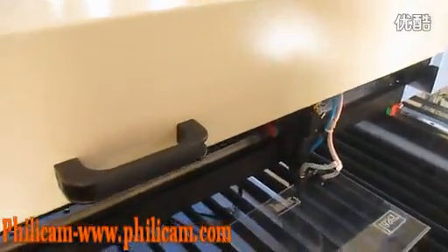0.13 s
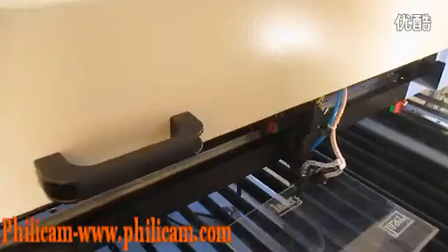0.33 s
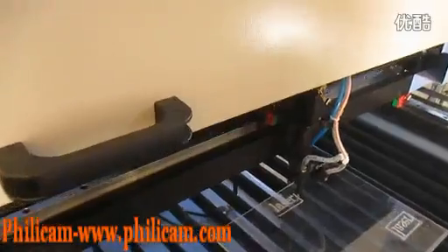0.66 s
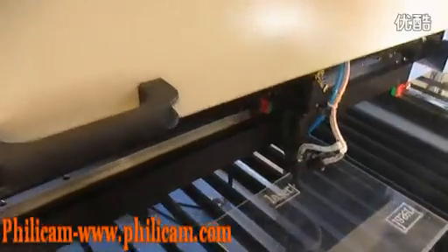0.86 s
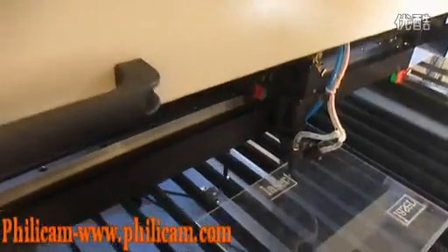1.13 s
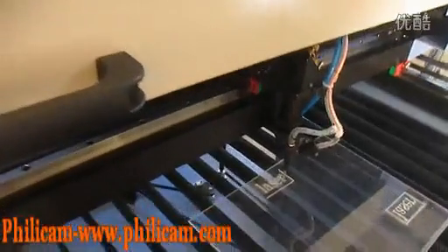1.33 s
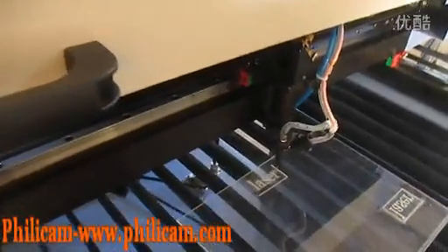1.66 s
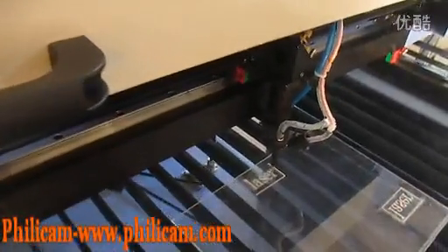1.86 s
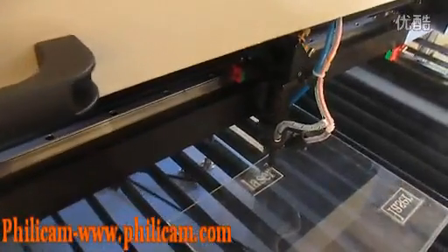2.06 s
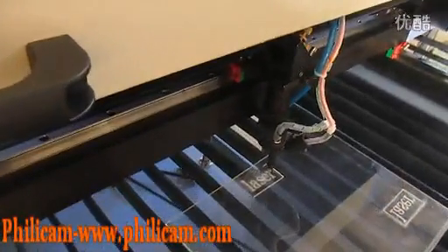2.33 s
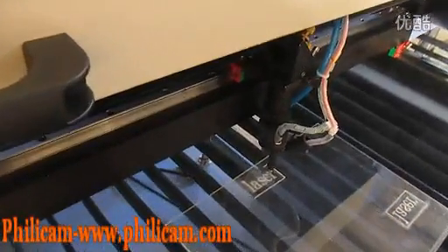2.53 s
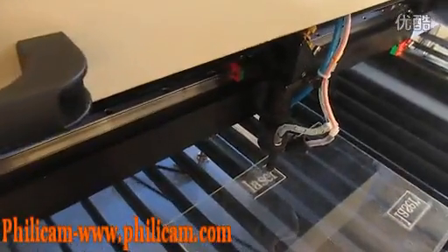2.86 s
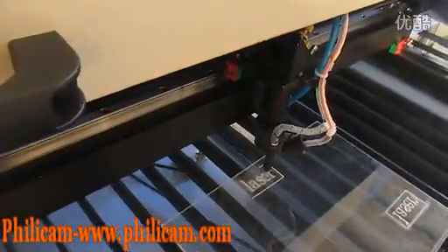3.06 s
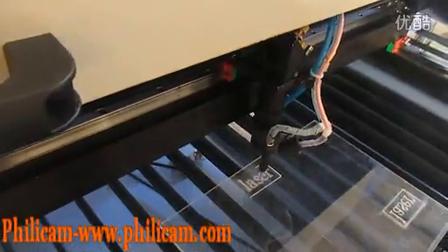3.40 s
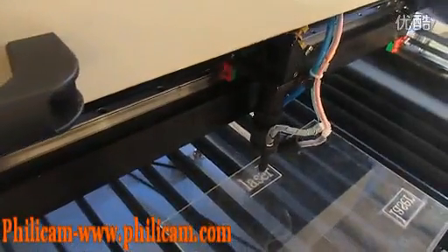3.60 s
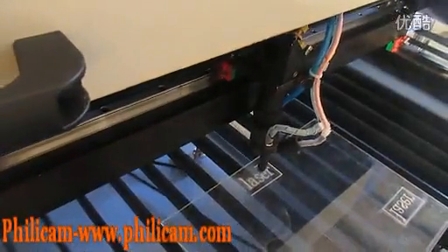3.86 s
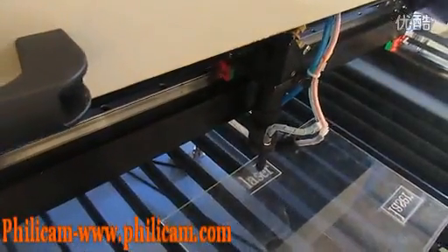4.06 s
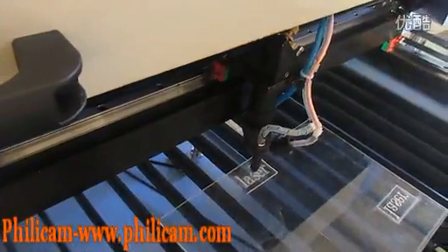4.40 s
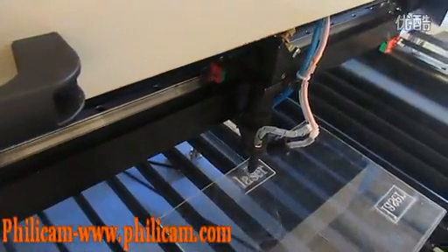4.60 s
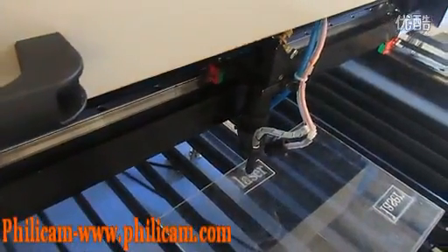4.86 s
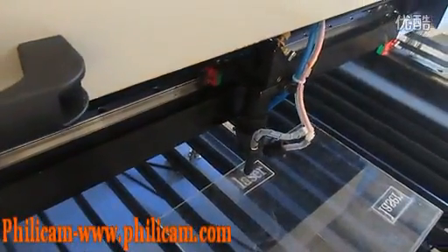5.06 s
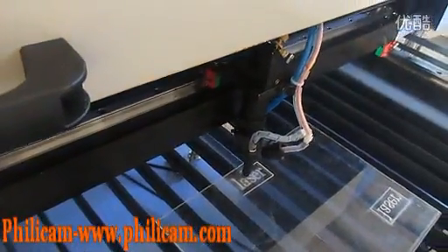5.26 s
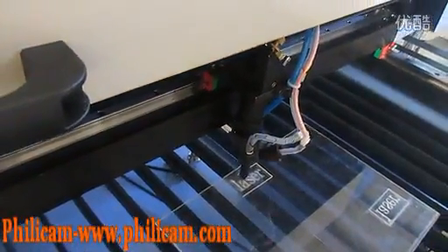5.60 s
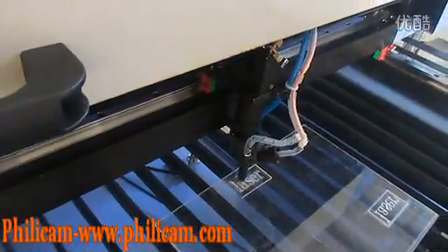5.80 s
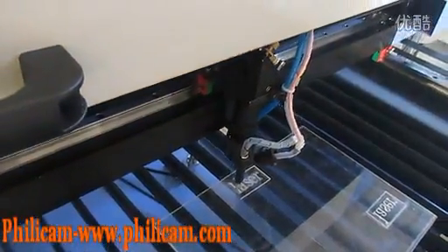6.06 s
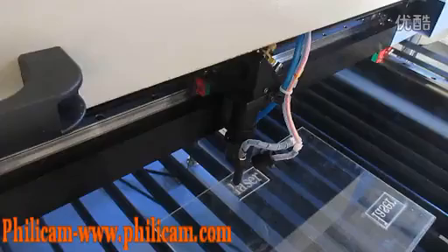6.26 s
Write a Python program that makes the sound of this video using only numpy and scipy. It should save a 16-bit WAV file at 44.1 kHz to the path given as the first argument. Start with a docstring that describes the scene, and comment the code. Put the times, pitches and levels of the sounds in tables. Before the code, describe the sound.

A flatbed laser cutter heard close up in a workshop. A loud, continuous mid-heavy extraction roar dominates, over a low mains hum. Fan tones whine steadily through it, swelling and fading, while the nozzle's air jet adds patchy hiss and shrill, unsteady whistles. The roar eases slightly midway, then recovers. Tiny treble ticks are barely noticeable. Nearly central stereo, with only the highest hiss spreading wide.

```python
"""A flatbed laser cutter in a workshop, heard in stereo from close by.
From the start extraction air roars (coloured noise) over a mains-rate pump hum and whining fans (wavering sines),
the nozzle's air jet hisses in four noise bands and whistles in moving resonances as the head moves, and the
treble flickers. Within the first second brief flecks of treble begin; the slow motor fades throughout, the roar
sinks midway and returns, and the high whistle, having slid down and faded, starts again higher."""
import sys
import numpy as np
from scipy import signal
from scipy.fft import rfft, irfft
from scipy.io import wavfile
from scipy.ndimage import uniform_filter1d

SR = 44100
rng = np.random.default_rng(int(sys.argv[2]) if len(sys.argv) > 2 else 0)


def put_to_file(sound):
    """Save the sound as 16-bit audio at rate SR, in the file named by the first command-line argument."""
    columns = np.atleast_2d(sound).T  # one column per channel
    safe = np.clip(columns, -1, 1)
    whole_steps = np.round(safe * 32767)
    wavfile.write(sys.argv[1], SR, whole_steps.astype(np.int16))


N = 283563  # length in samples
T = np.arange(N) / SR  # time in seconds

# Air roar of the extraction and the shop. Each row: frequency in Hz, relative spectrum level in dB.
ROAR_SPECTRUM = [(15, -13), (25, -13), (49, -16), (218, -5), (382, -4), (506, -0.5), (989, -2.5),
                 (1200, -1.5), (1490, -3.5), (1850, -5), (2250, -10), (2400, -10), (3200, -14.5),
                 (3780, -19.5), (4000, -24), (4230, -30.5), (4450, -21.5), (5720, -81), (9680, -120)]
# Broad resonances of ducts and cabinet. Each row: centre in Hz, width in Hz, boost in dB (negative: a dip).
DUCT_RESONANCES = [(218, 35, 4), (204, 52, 4), (252, 10, 7.5), (134, 39, -2.5), (170, 15.5, -8),
                   (344, 10, -1), (464, 26, 1.5), (706.6, 5.7, 11), (909, 35, 5.5), (1117, 46, 5),
                   (2060, 27, 4.5)]
# How deeply the treble flickers. Each row: frequency in Hz, depth in dB for one spread of the patches.
TREBLE_FLICKER = [(1500, 1), (2200, 6), (3200, 11), (4200, 17)]
PATCH_TOP = 0.9  # patches dip freely but rise no further than this many spreads
ROAR_DB, ROAR_SAG_DB = -21.5, 2.5  # level in dB, and how far it sinks midway
RUMBLE_DB, RUMBLE_SAG_DB = -27, 7.5  # the same for the low end
QUIET_S, SAG_WIDTH_S = 3.33, 4  # middle and half-width of the sinking, in seconds

# Pump on the mains. Each row: multiple of the mains rate, level in dB before it wavers.
PUMP_MULTIPLES = [(1, -44.5), (2, -42.5), (3, -40), (4, -44.5), (6, -44.5), (7, -42.5), (8, -47)]
PUMP_HZ = 50.0
MOTOR_HZ, MOTOR_DB, MOTOR_FADE_DB_PER_S = 73.2, -37.5, 5  # slow motor

# Higher fan's blade tone. Each row: time in seconds, level in dB.
FAN_HIGH_LEVEL = [(0, -30), (.4, -33.5), (.55, -42), (1.3, -35.5), (1.55, -30), (2.1, -28.5), (3, -29),
                  (4.3, -29.5), (5.02, -30.5), (5.1, -37), (5.25, -33), (6.43, -37)]
# Breathy fringe round that tone. Each row: time in seconds, level in dB.
FAN_FRINGE_LEVEL = [(0, -33.5), (.9, -38.5), (1.3, -52), (5.6, -51), (6.43, -40)]
# Whine near its second multiple. Each row: time in seconds, pitch in Hz, level in dB.
FAN_SECOND = [(0, 3789, -35), (.5, 3788.5, -35.5), (1.3, 3787, -40), (1.8, 3785, -45), (2.05, 3786, -58),
              (2.7, 3785, -48), (4.4, 3777, -49), (5.2, 3776, -50), (5.65, 3773, -42), (6.43, 3770, -41)]
# Lower fan's blade tone. Each row: time in seconds, level in dB.
FAN_LOW_LEVEL = [(0, -36.5), (1.0, -37), (1.38, -39), (1.5, -28), (1.65, -43), (1.9, -31.5), (2.25, -36.5),
                 (2.5, -27.5), (2.62, -42), (3.0, -46), (3.15, -31.5), (3.4, -39), (3.5, -29.5),
                 (4.2, -32.5), (4.75, -33), (5.12, -33), (5.28, -31.5), (6.43, -29)]
# Motor whine. Each row: time in seconds, level in dB.
MOTOR_WHINE_LEVEL = [(0, -44), (1.3, -46), (2, -41), (3.2, -35), (3.8, -38), (4.2, -42), (4.9, -35.5),
                     (5.4, -44), (6, -35), (6.43, -39)]
# Fainter steady whines. Each row: frequency in Hz, level in dB before it wavers.
FAINT_WHINES = [(104.2, -46), (146.6, -46), (512, -42), (833, -46), (880, -46), (1108.5, -48), (1251, -47)]
FAN_START_HZ, FAN_SAG_HZ_PER_S = 1895.3, 1.55  # the higher fan slows a little
FAN_LOW_HZ, WHINE_HZ = 1221.5, 1666.8
SECOND_FRINGE_DB = -5  # breathy fringe of the second-multiple whine, relative to its tone
LOW_SECOND_DB = -11.5  # lower fan's second multiple, relative to its blade tone

# Broad hiss of the air jet. Each row: frequency in Hz, relative spectrum level in dB.
HISS_SPECTRUM = [(3800, 8), (4500, 7.5), (5100, 17.5), (5350, 13), (5700, -71), (6500, -83.5), (6900, 0.5),
                 (7500, 4), (8700, 2.5), (8950, 11), (9150, -13)]
# Its level. Each row: time in seconds, level in dB.
HISS_LEVEL_CURVE = [(0, -45), (1.0, -36), (2.0, -42.5), (2.6, -37.5), (3.6, -41.5), (4.4, -43), (4.72, -49),
                    (4.9, -41), (6.43, -39.5)]
# Rough hiss above the low whistle. Each row: frequency in Hz, relative spectrum level in dB.
EDGE_SPECTRUM = [(4900, 3), (4980, 8), (5100, 0), (5300, -2), (5500, -5), (5620, -4), (5690, 0), (5770, -6),
                 (6050, -9), (6200, -30)]
# Its level. Each row: time in seconds, level in dB.
EDGE_LEVEL_CURVE = [(0, -37.5), (.9, -33.5), (1.66, -39.5), (1.75, -73), (1.85, -32), (1.95, -82),
                    (2.15, -35), (2.3, -60), (2.9, -78), (4.0, -63), (6.43, -74)]
# Fizz above the broad hiss. Each row: frequency in Hz, relative spectrum level in dB.
FIZZ_SPECTRUM = [(9560, -16), (9720, 12), (10300, -0.5), (10900, -22.5), (11500, -35.5), (11700, -57.5)]
# Its level. Each row: time in seconds, level in dB.
FIZZ_LEVEL_CURVE = [(0, -45), (.5, -43), (.62, -49), (1.2, -47), (1.5, -51), (1.9, -71), (2.3, -52),
                    (2.65, -43), (3.5, -46), (4.6, -55), (5.2, -44), (6.43, -45.5)]
# Topmost hiss. Each row: frequency in Hz, relative spectrum level in dB.
TOP_SPECTRUM = [(12000, -53), (12500, -6.5), (13050, 21), (13200, -31)]
# Its level, at times silent. Each row: time in seconds, level in dB.
TOP_LEVEL_CURVE = [(0, -120), (2.4, -120), (2.5, -56), (3.55, -58), (3.65, -120), (4.75, -120), (4.88, -62),
                   (5.6, -58), (6.43, -58)]
HISS_TOP = 1.4  # ceiling of the flicker in the hiss bands, in spreads

# Low nozzle whistle. Each row: time in seconds, pitch in Hz, level in dB before it wavers.
LOW_WHISTLE_PATH = [(0, 4750, -38), (.7, 4760, -37.5), (1.7, 4870, -35), (2.4, 4870, -33),
                    (3.8, 4840, -31.5), (4.8, 4830, -31.5), (5.6, 4805, -33.5), (6.43, 4810, -34)]
# Thin whistle below the high one. Each row: time in seconds, pitch in Hz, level in dB.
UNDER_WHISTLE_PATH = [(0, 9000, -75), (1.6, 9000, -65), (2.0, 8700, -62), (2.8, 8620, -53),
                      (3.55, 8780, -52), (3.75, 8400, -57), (6.43, 8800, -70)]
# High whistle: slides down, fades, starts again higher. Each row: time in seconds, pitch in Hz, level in dB.
HIGH_WHISTLE_PATH = [(0, 9130, -42), (.27, 9150, -43), (.45, 9300, -38.5), (1.2, 9330, -36.5),
                     (1.9, 9260, -35.5), (2.35, 9176, -37), (2.75, 9270, -46), (3.0, 9360, -45),
                     (3.6, 9380, -40), (4.2, 9290, -37.5), (4.85, 9250, -36.5), (5.55, 9190, -43),
                     (5.8, 9280, -41.5), (6.43, 9300, -42.5)]

# Brief flecks of treble. Each row: middle in seconds, level in dB, centre in Hz, half-length in seconds.
TREBLE_FLECKS = [(0.843, -48, 11300, .012), (0.925, -48, 6350, 0.012), (1.245, -54, 6500, .012),
                 (1.26, -50, 12000, .012), (3.348, -46, 5570, .012), (3.51, -42, 6200, .018),
                 (3.533, -46, 7500, .035), (3.555, -46, 5800, .012), (3.716, -45, 5950, .014),
                 (5.698, -52, 5580, 0.013), (5.97, -47, 6040, .014), (6.3, -50, 5500, .012)]
FLECK_WIDTH_HZ = 900

# Stereo difference of the jet. Each row: frequency in Hz, side level relative to the jet in dB.
SIDE_LEVEL = [(4000, -77), (6000, -47), (7500, -16.5), (9300, -8.5), (13000, -6)]
OFFSET = 0.0124  # steady offset of the converter, in full-scale units
EDGE_HZ = 13300  # upper band limit


def gain_of(db):
    """Decibels to amplitude."""
    return 10 ** (np.asarray(db) / 20)


def evened(x):
    """Scales to rms 1."""
    return x / np.sqrt(np.mean(x ** 2) + 1e-20)


def read(points, hz):
    """Reads a spectrum table on a log-frequency axis."""
    f, value = np.transpose(points)
    return np.interp(np.log(hz + 1), np.log(f + 1), value)


def curves(rows):
    """Every column after the time, interpolated to each sample."""
    s, *columns = np.transpose(rows)
    return [np.interp(T, s, column) for column in columns]


def level(rows):
    """Amplitude curve of a table of times and dB."""
    return gain_of(curves(rows)[0])


def wander(hz):
    """Slow random curve of rms 1, moving up to about hz times a second."""
    z = rfft(rng.standard_normal(N))
    rolloff = 1 + (np.fft.rfftfreq(N, 1 / SR) / hz) ** 2
    return evened(irfft(z / rolloff, N))


def flickering_noise(shape_db, patchy_db, size, top):
    """Noise from random short-time spectra with drifting patches, size bins tall, capped at top spreads."""
    frames, hz = N // 512 + 5, np.fft.rfftfreq(2048, 1 / SR)
    a, b, patches = rng.standard_normal((frames, 1025, 3)).T
    patches = uniform_filter1d(patches, size=size, axis=0)  # across frequency
    patches = evened(uniform_filter1d(patches, size=4, axis=1))  # across time
    spectrum_db = shape_db(hz)[:, None] + patchy_db * np.minimum(patches, top)
    z = (a + 1j * b) * gain_of(spectrum_db)
    return evened(signal.istft(z, nperseg=2048, noverlap=1536)[1][:N])


def roar():
    """Turbulent air coloured by ducts and cabinet; it sinks midway, the low end further; the treble flickers."""
    def shape_db(hz):
        """Broad spectrum plus the resonant boosts."""
        boosts = sum(db / (1 + (2 * (hz - f) / w) ** 2) for f, w, db in DUCT_RESONANCES)
        return read(ROAR_SPECTRUM, hz) + boosts

    sag = np.exp(-((T - QUIET_S) / SAG_WIDTH_S) ** 2)
    flicker_db = read(TREBLE_FLICKER, np.fft.rfftfreq(2048, 1 / SR))[:, None]
    noise = flickering_noise(shape_db, flicker_db, size=4, top=PATCH_TOP)
    low = signal.sosfiltfilt(signal.butter(2, 280, fs=SR, output="sos"), noise)
    upper = gain_of(ROAR_DB - ROAR_SAG_DB * sag) * (noise - low)
    rumble = gain_of(RUMBLE_DB - RUMBLE_SAG_DB * sag) * evened(low)
    return upper + rumble


def tone(hz, waver_hz, waver_db):
    """A sine, of rms 1 before its level wavers, whose pitch wavers too."""
    turns = np.cumsum(hz + waver_hz * wander(7.2)) / SR + rng.random()
    return np.sqrt(2) * np.sin(2 * np.pi * turns) * gain_of(waver_db * wander(35.0))


def pump():
    """Steady-pitched multiples of the mains rate with wavering levels, and the slow motor fading away."""
    out = np.zeros(N)
    for multiple, db in PUMP_MULTIPLES:
        turns = multiple * PUMP_HZ * T + rng.random()
        out += gain_of(db + 3.7 * wander(9.8)) * np.sqrt(2) * np.sin(2 * np.pi * turns)
    motor = tone(MOTOR_HZ, waver_hz=.2, waver_db=2.0)
    return out + gain_of(MOTOR_DB - MOTOR_FADE_DB_PER_S * T) * motor


def narrow(hz, width_hz):
    """Noise of rms 1 in a steep-sided band that follows the curve hz."""
    f = np.fft.fftfreq(N, 1 / SR)
    z = rng.standard_normal(N) + 1j * rng.standard_normal(N)
    slow = np.fft.ifft(z * np.exp(-(2 * f / width_hz) ** 2))
    carrier = np.exp(2j * np.pi * np.cumsum(hz) / SR)
    return evened((slow * carrier).real)


def fans():
    """Blade tones that swell and fade in the standing waves of the shop, breathy fringes and motor whines."""
    high_hz = FAN_START_HZ - FAN_SAG_HZ_PER_S * T
    second_hz, second_db = curves(FAN_SECOND)
    low = level(FAN_LOW_LEVEL)
    out = level(FAN_HIGH_LEVEL) * tone(high_hz, waver_hz=0.99, waver_db=0.55)
    out += level(FAN_FRINGE_LEVEL) * narrow(high_hz - 8, width_hz=100)
    out += gain_of(second_db) * tone(second_hz, waver_hz=1.6, waver_db=3.2)
    out += gain_of(second_db + SECOND_FRINGE_DB) * narrow(second_hz - 20, width_hz=150)
    out += low * tone(FAN_LOW_HZ, waver_hz=0.45, waver_db=2.0)
    out += low * gain_of(LOW_SECOND_DB) * tone(2 * FAN_LOW_HZ, waver_hz=1.0, waver_db=1.5)
    out += level(MOTOR_WHINE_LEVEL) * tone(WHINE_HZ, waver_hz=0.75, waver_db=3.0)
    for hz, db in FAINT_WHINES:
        out += gain_of(db) * tone(hz, waver_hz=hz * 0.00087, waver_db=1.6)
    return out


def banded(points, patchy_db):
    """Band of noise that flickers, held between the ends of its spectrum."""
    def shape_db(hz):
        """The table, 80 dB lower beyond its ends."""
        outside = (hz < points[0][0]) | (hz > points[-1][0])
        return read(points, hz) - 80 * outside

    return flickering_noise(shape_db, patchy_db, size=8, top=HISS_TOP)


def whistle(hz, width_hz, jitter_hz, firm):
    """Noise in a steep moving resonance, with a firm core whose pitch jitters quickly within bounds."""
    core_hz = hz + jitter_hz * np.tanh(wander(39.6))
    core = evened(np.sin(2 * np.pi * np.cumsum(core_hz) / SR))
    return np.sqrt(firm) * core + np.sqrt(1 - firm) * narrow(hz, width_hz)  # firm: core's share of power


def jet():
    """Nozzle air: hiss in four bands and three whistles; the treble flickers."""
    low_hz, low_db = curves(LOW_WHISTLE_PATH)
    under_hz, under_db = curves(UNDER_WHISTLE_PATH)
    high_hz, high_db = curves(HIGH_WHISTLE_PATH)
    out = level(HISS_LEVEL_CURVE) * banded(HISS_SPECTRUM, patchy_db=42.0)
    out += level(EDGE_LEVEL_CURVE) * banded(EDGE_SPECTRUM, patchy_db=47.0)
    out += level(FIZZ_LEVEL_CURVE) * banded(FIZZ_SPECTRUM, patchy_db=24.5)
    out += level(TOP_LEVEL_CURVE) * banded(TOP_SPECTRUM, patchy_db=5.0)
    low_gain = gain_of(low_db + 0.91 * wander(6.0))
    out += low_gain * whistle(low_hz, width_hz=310, jitter_hz=84.6, firm=0.51)
    out += gain_of(under_db) * whistle(under_hz, width_hz=98, jitter_hz=39.0, firm=0.4)
    out += gain_of(high_db) * whistle(high_hz, width_hz=390, jitter_hz=69.55, firm=0.54)
    return out


def treble_flecks():
    """Brief flecks of treble: band-passed noise under short smooth swells, each at its own centre."""
    out = np.zeros(N)
    for s, db, hz, half_s in TREBLE_FLECKS:
        edges = [hz - FLECK_WIDTH_HZ / 2, hz + FLECK_WIDTH_HZ / 2]
        band = signal.butter(2, edges, "bandpass", fs=SR, output="sos")
        noise = evened(signal.sosfiltfilt(band, rng.standard_normal(N)))
        out += gain_of(db) * np.exp(-((T - s) / half_s) ** 2) * noise
    return out


def scene():
    """All in the centre; only the top of the jet reaches the two microphone ports unlike."""
    mid = roar() + pump() + fans() + jet() + treble_flecks()
    side_gain = gain_of(read(SIDE_LEVEL, np.fft.rfftfreq(N, 1 / SR)))
    side = irfft(rfft(jet()) * side_gain, N)  # a second, independent draw of the jet
    return np.array([mid + side, mid - side])


def record(dry):
    """Band limit and steady offset of the converter."""
    taps = signal.firwin(511, EDGE_HZ, window=("kaiser", 9), fs=SR)
    return signal.oaconvolve(dry, taps[None], "same") + OFFSET


dry = scene()
out = record(dry)
put_to_file(out)
```